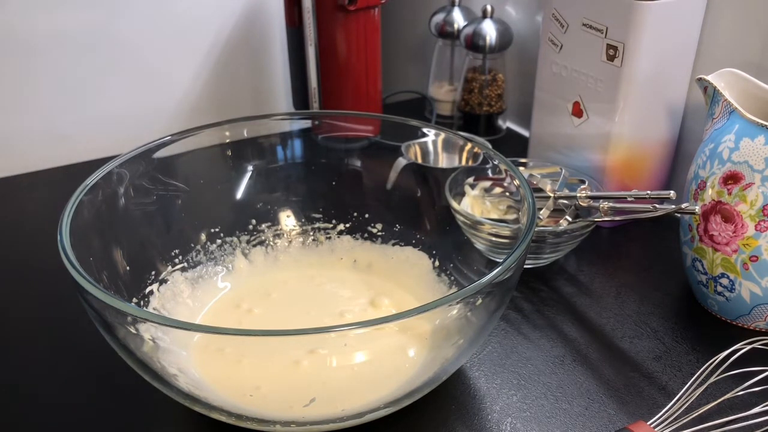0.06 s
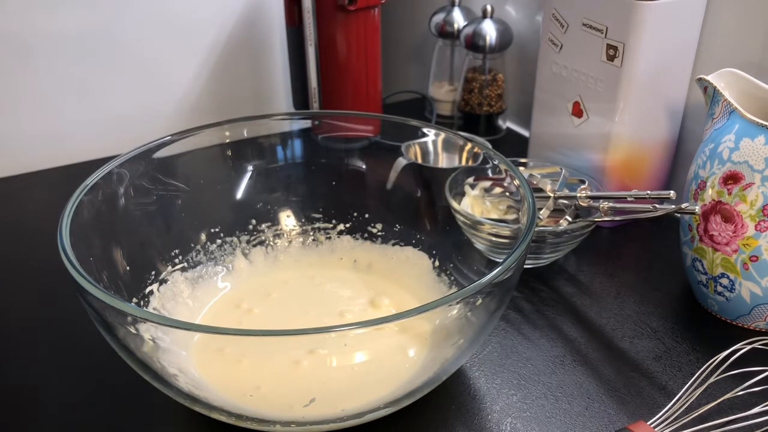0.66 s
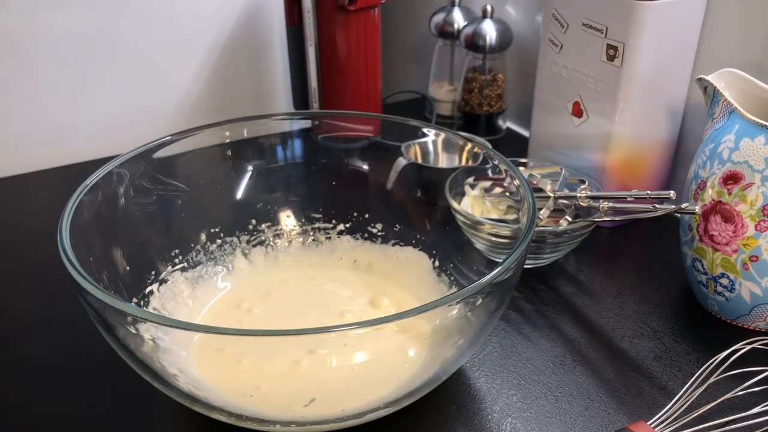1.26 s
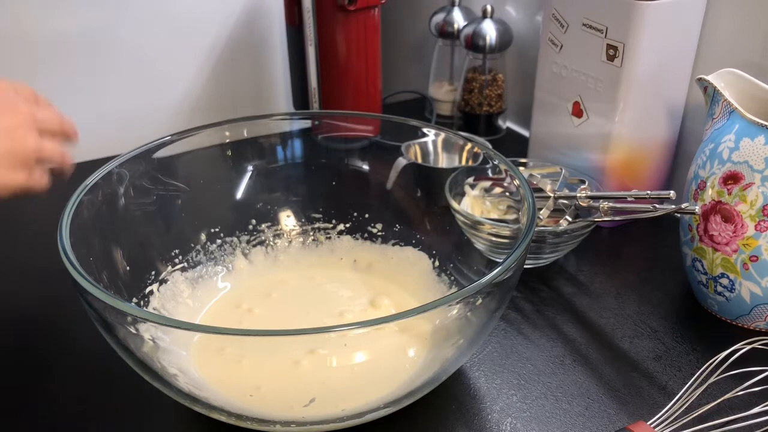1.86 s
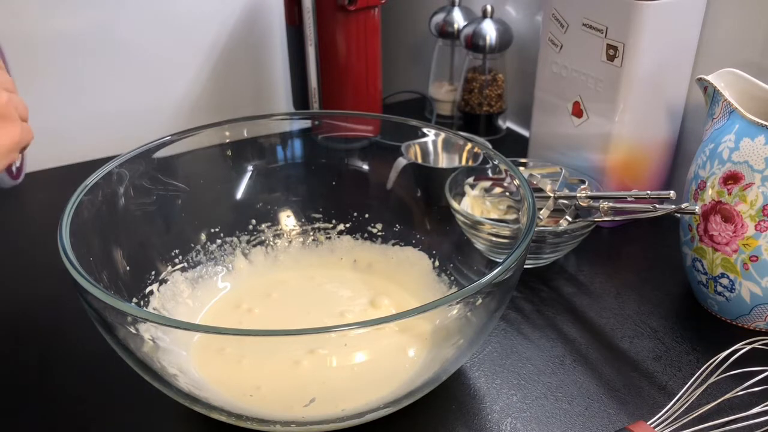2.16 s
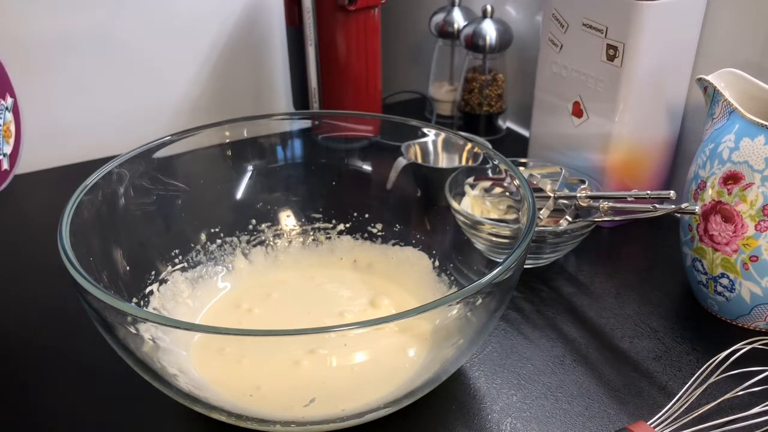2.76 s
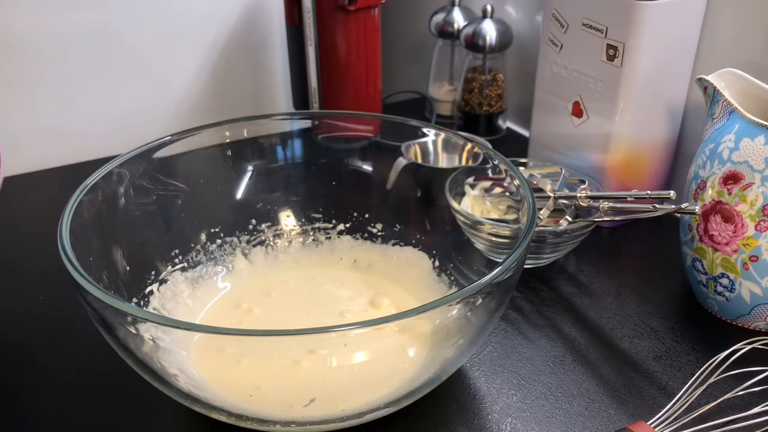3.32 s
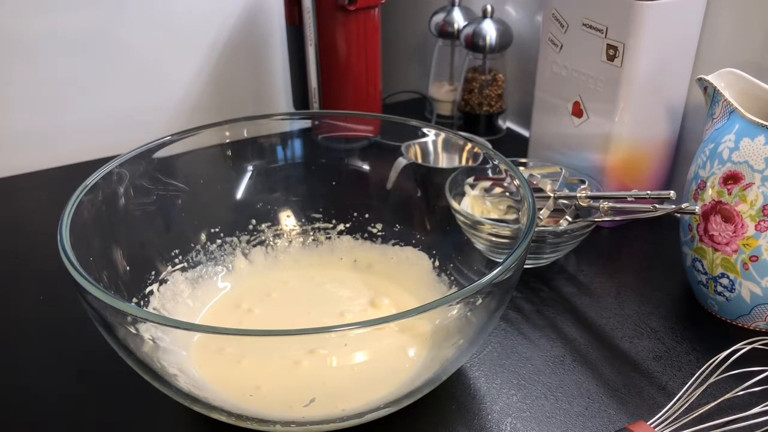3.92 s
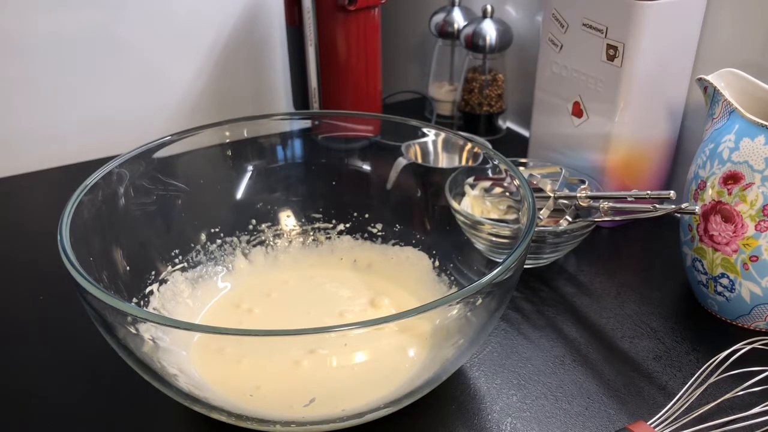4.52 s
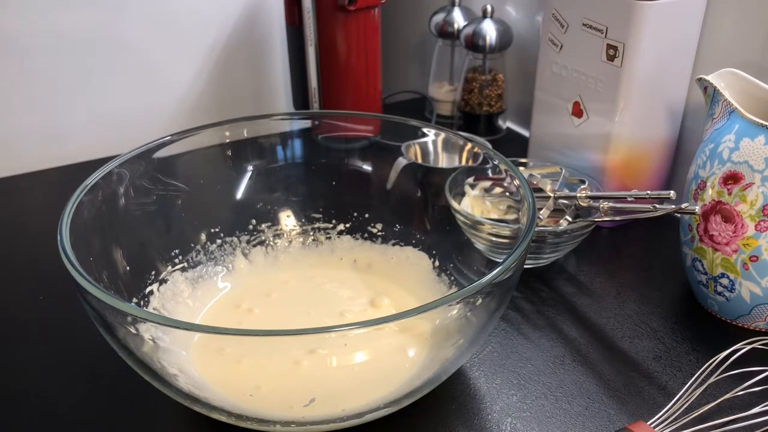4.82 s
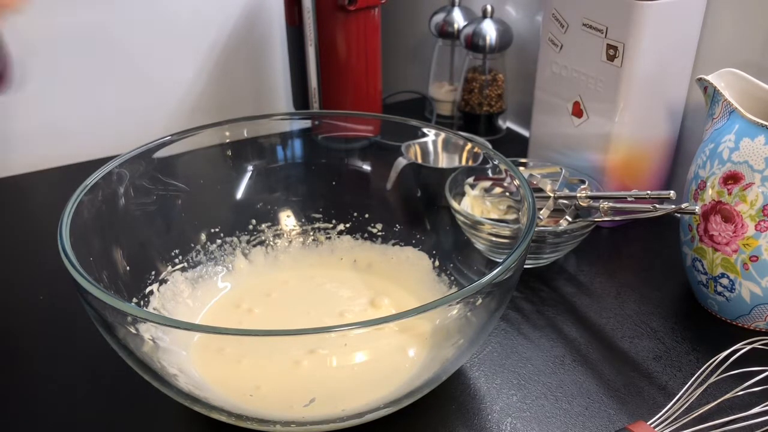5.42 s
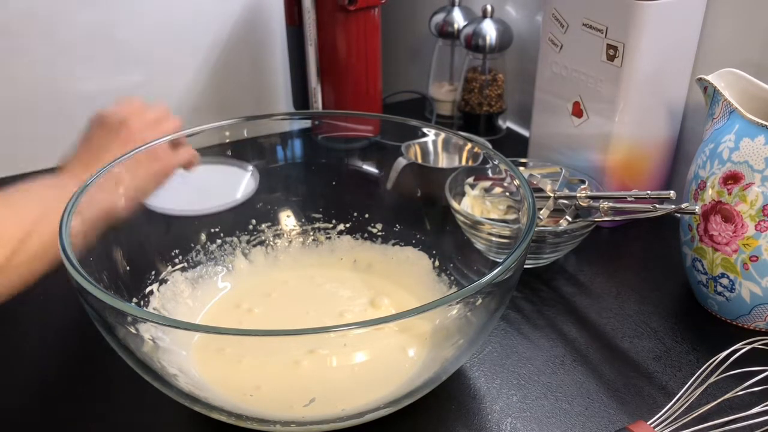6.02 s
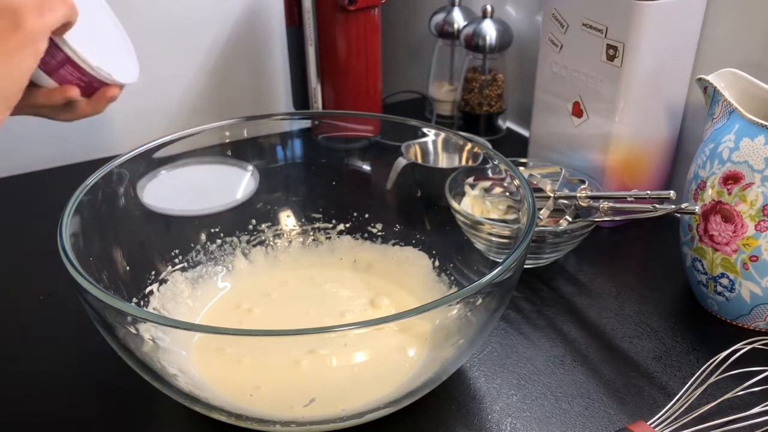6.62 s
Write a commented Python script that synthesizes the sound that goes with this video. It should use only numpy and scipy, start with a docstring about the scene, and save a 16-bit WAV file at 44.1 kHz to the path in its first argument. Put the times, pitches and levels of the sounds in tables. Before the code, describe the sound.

Close hands open a plastic tub in a quiet kitchen: lid snaps, soft rubbing, a short seal rip, and the lid set down.

```python
"""A quiet kitchen, where a plastic tub is opened by hand, close by.
The lid is prised off with hollow pops and rim clicks, the seal lets go in sharp cracks and a short rip,
and the lid is laid on the worktop. Each blow is an impulse that excites the modes of a thin shell.
In between, fingers slide with stick-slip friction, and the flexing tub pushes out low puffs of air.
The hard walls answer each snap with a short reverberation, over a faint rumble and hiss."""
import sys
import numpy as np
from scipy import signal
from scipy.fft import rfft, irfft
from scipy.io import wavfile
from scipy.ndimage import uniform_filter1d

SR = 44100
rng = np.random.default_rng(int(sys.argv[2]) if len(sys.argv) > 2 else 0)


def log_audio(samples):
    """Write samples as a 16-bit WAV file to the path given in sys.argv[1]."""
    # one column per channel
    frames = np.atleast_2d(samples).T
    # limit to full scale, then quantise
    limited = np.clip(frames, -1, 1)
    pcm = np.round(limited * 32767).astype(np.int16)
    wavfile.write(sys.argv[1], SR, pcm)


N = 294588
LEAD = SR // 4   # the scene starts a little earlier, so that the room already rings
TIME = np.arange(-LEAD, N) / SR

# Spectral shape of the background noise: frequency_hz, relative_density_db
ROOM_TONE_SPECTRUM = [(10, -52), (25, -23), (45, -8.5), (100, -6.5), (170, -7.5), (330, -12.5), (480, -17),
                      (660, -13), (950, -23.5), (1500, -24.5), (3700, -27.5), (11900, -37.5),
                      (16000, -37.5)]
# Reverberation time of the kitchen: frequency_hz, t60_s
REVERB_TIMES = [(150, 0.36), (500, 0.45), (1200, 0.41), (2500, 0.47), (5000, 0.48), (8000, 0.38),
                (12000, .3), (16000, 0.29)]
# Colour of the reverberation: frequency_hz, gain_db
REVERB_COLOUR = [(150, -2.5), (500, 1.5), (1200, 3), (2100, 0), (3200, -1), (5000, -2.5), (8000, 0.5),
                 (12000, -1), (16000, -1)]
# Hollow ware on the worktop, ringing in sympathy: frequency_hz, width_hz, lift_db
HOLLOW_WARE_MODES = [(279, 5.4, 7.5), (1106, 20, 1), (1287, 10, 6)]
# Air pushed by the flexing tub: start_s, amplitude_db, pitch_hz, t60_s
AIR_PUFFS = [(3.517, -39, 140, 0.05), (3.776, -46, 175, 0.066), (5.166, -25.5, 169, 0.033),
             (5.173, -35, 80, 0.12), (5.234, -35, 140, 0.029), (5.88, -44.5, 165, 0.066)]
# Plastic rubbing (fingers sliding, and the seal's short loud rip at 5.2 s):
# peak_s, half_width_s, level_db, relative_treble_db
PLASTIC_RUBS = [(.332, .009, -64, -10), (0.408, 0.013, -60.5, -2.5), (0.444, 0.0036, -38.5, -9),
                (0.542, 0.0062, -48, -3), (0.629, 0.015, -43.5, -2.5), (0.853, 0.02, -59.5, 3.5),
                (1.7, 0.15, -66, -2), (1.837, .0105, -49, -3.5), (3.348, 0.021, -53.5, 0.5),
                (3.396, 0.012, -57, 1), (3.52, 0.12, -65, -4.5), (3.7, .037, -62.5, -0.5),
                (4.286, 0.011, -51, -3.5), (4.57, 0.059, -55.5, -4.5), (4.95, .016, -48, -6),
                (5.206, 0.025, -29, -2.5), (5.6, 0.16, -70.5, 3.5), (6.66, 0.029, -69, 1.5)]
# Contour of one long slide as the tub is turned in the hand: time_s, treble_db, middle_db
TURNING_SLIDE = [(2.12, -101, -90), (2.19, -74, -86), (2.278, -72, -67.5), (2.542, -58.5, -65),
                 (2.63, -87, -74), (2.72, -84.5, -90)]
# Light fingertip touches on the tub: start_s, level_db
FINGER_TOUCHES = [(0.4082, -52.5), (0.9098, -57.5), (1.1235, -43.5), (1.1693, -51), (2.0775, -66),
                  (2.9364, -53), (3.3292, -54.5), (3.9962, -51), (4.384, -59.5), (4.914, -52), (5.415, -52)]

# Limits of the five bands of a blow (thud, middle, clack, crack, air): edge_hz
BLOW_BAND_EDGES = [190, 700, 1700, 5000, 10000, 17500]
# Blows: start_s, level_db, brightness_db, room_send_db, pitch_hz
# The level is that of the middle band; the pitch is that of the patch of plastic that gives way.
LID_BUCKLES = [(0.1519, -38.5, -25.5, -8.5, 1080), (1.0419, -39.5, -18, -7.5, 1120),
               (1.0919, -43.5, 3, -13.5, 1290), (1.1369, -41, -7, -12.5, 1150),
               (1.2329, -40, -20, -9.5, 1100), (1.4139, -25, -3.5, -10, 1353), (3.7464, -36, -25, -12, 980),
               (3.7718, -33, 3, -20, 7300), (3.7772, -19, -3.5, -11.5, 1200),
               (3.9569, -36.5, -24, -11.5, 800)]   # the thin lid buckles
RIM_SLIPS = [(2.7649, -34.5, 4, -8.5, 3900), (2.8129, -33, -8, -10.5, 1900), (2.9599, -44, -31, -8.5, 1160),
             (3.0409, -25, -4, -9.5, 1370), (4.2459, -50.5, -24.5, -10, 2800)]   # the rim slips over the lip of the tub
TUB_BUMPS = [(-.03, -33.5, -2, -4, 1920), (.4479, -42, 8, -7.5, 446), (.6209, -46, -10, -5.5, 1150),
             (.6299, -41, -13.5, -14, 630), (.9645, -59, -39, -4.5, 480), (.9759, -39, -20.5, -7, 530),
             (.9949, -38.5, -8.5, -6, 910), (1.7539, -48.5, -14.5, -12.5, 606),
             (3.5145, -38, -60.5, -10, 366), (5.2349, -37.5, -24, -9, 376)]   # bumps and taps on the filled tub
SEAL_RELEASES = [(4.6057, -26.5, -0.5, -8, 2060), (4.6207, -28.5, -7, -8, 1930),
                 (4.7422, -32, -0.5, -11, 5170), (4.9602, -33.5, 4.5, 2.5, 740),
                 (5.1652, -30, 2.5, -1.5, 283)]   # the seal lets go
LID_LANDING = [(5.8769, -39, 0.03, -6, 4140), (5.9184, -46.5, 2.7, -11, 4240)]   # the lid lands on the worktop and bounces once
EDGE_TAPS = [(5.4825, -46.5, 2, -6, 2316), (6.4745, -57, -26, -10, 2800)]   # light taps on a free edge, which rings clearly
# Modes of each struck part (a negative lift is a gap between modes): frequency_hz, width_hz, lift_db
LID_RESONANCES = [(435, 160, 7), (920, 90, 8.5), (1116, 80, 15), (1271, 40, 14), (2060, 380, 11),
                  (2700, 400, 3), (4050, 1500, -6.5), (7366, 1500, 5)]
RIM_RESONANCES = [(845, 70, 14), (1134, 78, 17), (1380, 120, 9.7), (2030, 720, 11), (2640, 530, 8),
                  (4430, 530, 2.4), (10800, 900, 2)]
TUB_RESONANCES = [(390, 40, 12), (526, 30, 16), (815, 180, 11), (1100, 150, 5.1), (2010, 290, 8.3)]
SEAL_RESONANCES = [(282, 45, 4.5), (372.4, 210, 10), (1090, 79, 10), (1330, 340, 4.7), (1900, 100, 7.8),
                   (1830, 240, 4.9), (2470, 45, 5.2), (2620, 70, 2.6), (5250, 930, 2.7), (12700, 3300, 2.1)]
LANDING_RESONANCES = [(358, 52, 16.4), (1310, 270, 14.7), (2020, 350, 8.5), (2510, 260, 3.2),
                      (4310, 2000, 4.8), (6290, 2500, 4.3)]
EDGE_RESONANCES = [(1747, 100, 13), (2530, 140, 10.8), (2890, 147, 9.4)]


def from_db(db):
    """Amplitude ratio of a level in decibels."""
    return 10 ** (np.asarray(db) / 20)


def rms_one(x):
    """Normalisation to unit rms."""
    return x / np.sqrt(np.mean(x ** 2) + 1e-20)


def at_hz(points, hz):
    """Interpolation of a table on a logarithmic frequency axis."""
    frequencies, values = np.transpose(points)
    return np.interp(np.log(np.maximum(hz, 1)), np.log(frequencies), values)


def band(x, low_hz, high_hz, order=3):
    """Causal band-pass filtering."""
    edges_hz = [low_hz, min(high_hz, SR / 2 - 100)]
    return signal.sosfilt(signal.butter(order, edges_hz, "band", fs=SR, output="sos"), x)


def add(out, start_s, x):
    """Superposition: x joins out at start_s."""
    at = max(LEAD + int(round(start_s * SR)), 0)
    out[at:at + len(x)] += x[:len(out) - at]


def resonate(x, modes):
    """Modal response: the excitation plus a damped second-order resonance for each mode."""
    out = x.copy()
    for hz, width_hz, lift_db in modes:
        out += (from_db(lift_db) - 1) * signal.lfilter(*signal.iirpeak(hz, hz / width_hz, fs=SR), x)
    return out


def room_tone(level_db):
    """Stationary coloured noise: a low rumble and a faint hiss."""
    hz = np.fft.rfftfreq(N, 1 / SR)
    spectrum = rfft(rng.standard_normal(N)) * from_db(at_hz(ROOM_TONE_SPECTRUM, hz))
    return from_db(level_db) * rms_one(irfft(spectrum, N))


def kitchen_reverb(x, first_wall_s, early_gain):
    """Reverberation: weak echoes from things on the worktop, then a diffuse decay from the walls."""
    t = np.arange(SR * 3 // 4) / SR
    edges_hz = np.geomspace(90, 19000, 15)
    build_up = np.where(t < first_wall_s, early_gain * (t > first_wall_s / 2), 1)
    response = np.zeros(len(t))
    for low, high in zip(edges_hz, edges_hz[1:]):
        hz = np.sqrt(low * high)
        decay = 1e-3 ** (t / at_hz(REVERB_TIMES, hz))
        reflections = band(rng.standard_normal(len(t)), low, high)
        response += from_db(at_hz(REVERB_COLOUR, hz)) * reflections * decay * build_up
    return signal.fftconvolve(x, response / np.sqrt(SR * 0.025))[:len(x)]


def air_puffs():
    """Damped oscillation: the tub wall springs back and displaces air for a few slow cycles."""
    out, t = np.zeros(len(TIME)), np.arange(SR // 4) / SR
    for start_s, amplitude_db, pitch_hz, t60_s in AIR_PUFFS:
        decay = 1e-3 ** (t / t60_s)
        add(out, start_s, from_db(amplitude_db) * np.sin(2 * np.pi * pitch_hz * t) * decay)
    return band(out, 48, 900)


def plastic_rubbing(grain_db, catch_db, catches_per_s, room_send_db):
    """Stick-slip friction: grainy noise of sliding fingers and the seal's rip; (direct, room send)."""
    times, treble_db, middle_db = np.transpose(TURNING_SLIDE)
    treble = from_db(np.interp(TIME, times, treble_db + 0.5, -np.inf, -np.inf))
    middle = from_db(np.interp(TIME, times, middle_db - 2, -np.inf, -np.inf))
    for peak_s, half_width_s, level_db, relative_treble_db in PLASTIC_RUBS:
        swell = from_db(level_db) * np.exp(-((TIME - peak_s) / half_width_s) ** 2)
        middle += swell
        treble += swell * from_db(relative_treble_db)
    roughness = rms_one(uniform_filter1d(rng.standard_normal(len(TIME)), size=120))
    # the surfaces catch and let go with tiny ticks
    catches = (rng.random(len(TIME)) < catches_per_s / SR) * from_db(catch_db)
    friction = (from_db(grain_db * roughness) + catches) * rng.standard_normal(len(TIME))
    shell = resonate(friction, [(1020, 83, 7.1), (2270, 1300, 1.6), (5213, 290, 9.7), (6650, 1600, 7.6)])
    rub = middle * rms_one(band(shell, 940, 3800, order=2))
    rub += treble * rms_one(band(shell, 3200, 13000, order=2))
    return np.array([rub, rub * from_db(room_send_db)])


def grip_modes(lift_db, q, count=7):
    """Boundary conditions: the higher modes of a thin shell shift with every change of grip."""
    frequencies = np.geomspace(1400, 9000, count) * 2 ** rng.uniform(-0.22, .2, count)
    return [(hz, hz / q, lift_db) for hz in frequencies]


def soft_contact(x, top_hz, brightness_db, db_per_octave=15):
    """Contact time limits bandwidth: a softer contact lasts longer, which lowers its cutoff."""
    cutoff_hz = min(top_hz * 2 ** (min(brightness_db, 0) / db_per_octave), 20000)
    return signal.sosfilt(signal.butter(2, cutoff_hz, fs=SR, output="sos"), x)


def blow_colour(thud_db, treble_db, brightness_db, pitch_hz, small_patch_hz=1076):
    """Spectral balance: a large, low patch moves more air; a hard contact lifts the top bands most."""
    weight_db = 9.5 * max(np.log2(small_patch_hz / pitch_hz), 0)   # 9.5 dB per octave
    upper_db = np.array(treble_db) + brightness_db * np.array([0.28, 0.8, 1])   # clack, crack, air
    return [thud_db + weight_db, 0, *upper_db]


def shell_blows(events, modes, thud_db, treble_db, t60_s, top_hz, snap,
                pitch_lift_db, pitch_q, room_shudder, damping):
    """Impact excitation: a snap and a short shudder ring a shell's modes; (direct, room send)."""
    out = np.zeros((2, len(TIME)))
    t = np.arange(SR // 7) / SR
    band_t60_s = t60_s / damping ** np.arange(-1, 4)   # with damping above 1, higher bands die sooner
    decay = 1e-3 ** (t / band_t60_s[:, None, None])
    for start_s, level_db, brightness_db, room_send_db, pitch_hz in events:
        force = rng.standard_normal((5, 2, len(t))) * decay   # one shudder for each band and path
        force /= np.linalg.norm(force, axis=-1, keepdims=True)
        force[:, 1] *= room_shudder   # the room collects all directions, which evens out the colour
        force[:, :, 0] += [snap, 1]   # the opening impulse on each path
        patch_mode = (pitch_hz, pitch_hz / pitch_q, pitch_lift_db)
        shell = resonate(force, [*modes, *grip_modes(lift_db=8.5, q=140), patch_mode])
        shell = soft_contact(shell, top_hz, brightness_db)
        blow = np.zeros((2, len(t)))
        for k, colour_db in enumerate(blow_colour(thud_db, treble_db, brightness_db, pitch_hz)):
            part = band(shell[k], BLOW_BAND_EDGES[k], BLOW_BAND_EDGES[k + 1])
            part *= np.sqrt(SR / 100) / np.linalg.norm(part, axis=1, keepdims=True)   # as 10 ms at rms 1
            blow += from_db(level_db + colour_db) * part
        add(out[0], start_s, blow[0])
        add(out[1], start_s, blow[1] * from_db(room_send_db))
    return out


def scene():
    """Superposition of the direct sound of the handling, its reverberant field and the room tone."""
    pops = shell_blows(
        LID_BUCKLES, LID_RESONANCES, thud_db=-14.5, treble_db=(-7.5, 0, -6), t60_s=0.055,
        top_hz=11140, snap=0.58, pitch_lift_db=14, pitch_q=11, room_shudder=0.39, damping=1.12)
    clicks = shell_blows(
        RIM_SLIPS, RIM_RESONANCES, thud_db=-17, treble_db=(1.5, -2.5, -1.5), t60_s=0.066,
        top_hz=17200, snap=0.14, pitch_lift_db=15, pitch_q=3.4, room_shudder=0.48, damping=1.25)
    # touches are soft blows that share one brightness_db, room_send_db and pitch_hz
    touches = [(start_s, level_db, -19.5, -6, 1091) for start_s, level_db in FINGER_TOUCHES]
    knocks = shell_blows(
        TUB_BUMPS + touches, TUB_RESONANCES, thud_db=-7, treble_db=(-1.5, -.5, -3), t60_s=0.059,
        top_hz=16100, snap=0.58, pitch_lift_db=12.5, pitch_q=9.3, room_shudder=0.51, damping=1.1)
    cracks = shell_blows(
        SEAL_RELEASES, SEAL_RESONANCES, thud_db=-14, treble_db=(4.8, 5.2, 3), t60_s=0.046,
        top_hz=17000, snap=0.5, pitch_lift_db=7.5, pitch_q=3.3, room_shudder=0.4, damping=1.33)
    landing = shell_blows(
        LID_LANDING, LANDING_RESONANCES, thud_db=-3.5, treble_db=(11.5, 7.3, -2.2), t60_s=0.045,
        top_hz=11800, snap=0.23, pitch_lift_db=10.5, pitch_q=9.3, room_shudder=0.15, damping=1.08)
    taps = shell_blows(
        EDGE_TAPS, EDGE_RESONANCES, thud_db=-7.5, treble_db=(5, -17, -24), t60_s=0.08,
        top_hz=6000, snap=0.48, pitch_lift_db=16, pitch_q=29, room_shudder=0.53, damping=0.93)
    rubs = plastic_rubbing(grain_db=3, catch_db=14.5, catches_per_s=120, room_send_db=-10)
    direct, room_send = pops + clicks + knocks + cracks + landing + taps + rubs
    puffs = air_puffs()
    room_drive = resonate(room_send, HOLLOW_WARE_MODES) + from_db(-3.5) * puffs
    reverb = kitchen_reverb(room_drive, first_wall_s=0.013, early_gain=.55)
    return ((direct + puffs + reverb)[LEAD:] + room_tone(level_db=-68.5))[None]


def record(dry):
    """Soft saturation rounds the highest peaks, and a steep low-pass limits the bandwidth."""
    ceiling, cutoff_hz = 0.98, 16100
    rounded = ceiling * np.tanh(dry / ceiling)
    return signal.sosfilt(signal.ellip(10, .2, 70, cutoff_hz, fs=SR, output="sos"), rounded)


dry = scene()
out = record(dry)
log_audio(out)
```